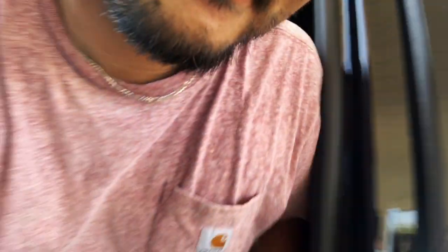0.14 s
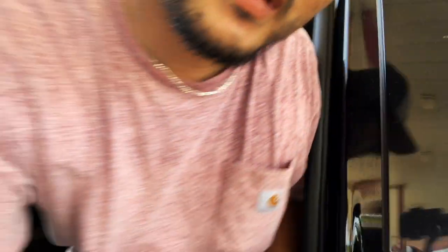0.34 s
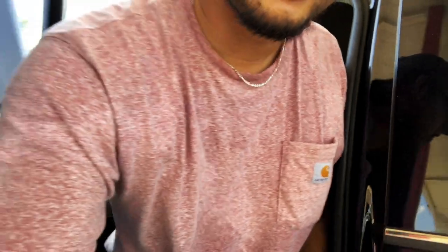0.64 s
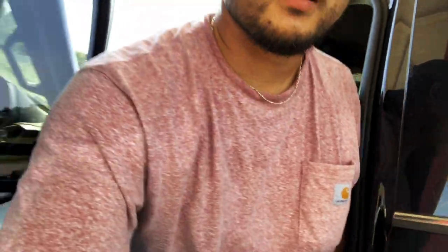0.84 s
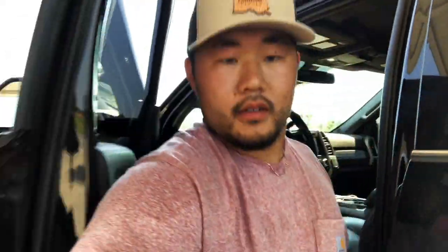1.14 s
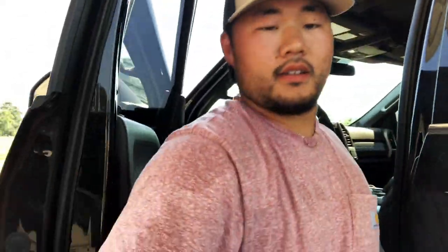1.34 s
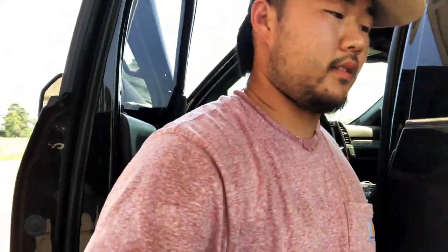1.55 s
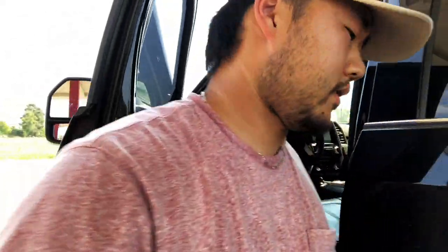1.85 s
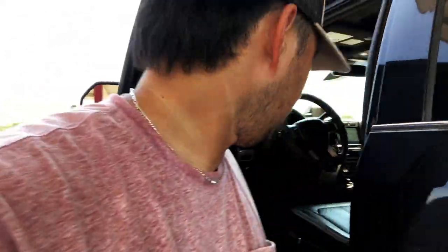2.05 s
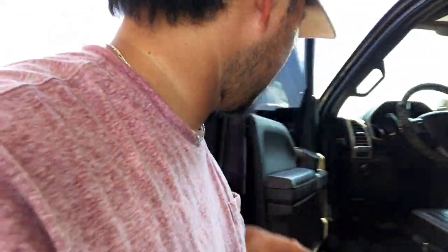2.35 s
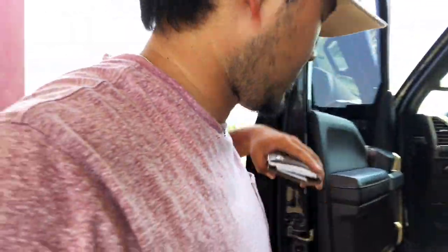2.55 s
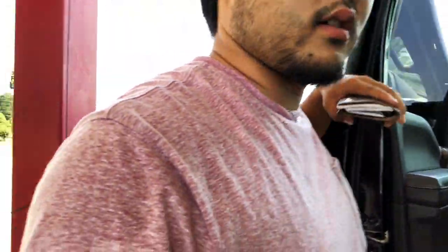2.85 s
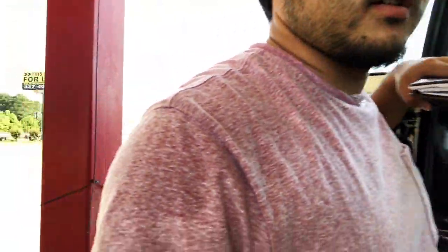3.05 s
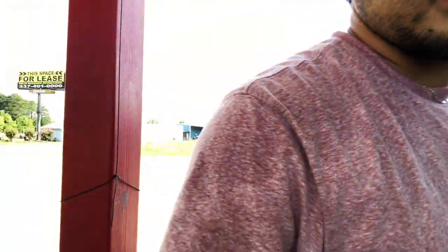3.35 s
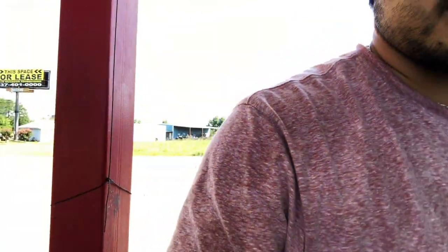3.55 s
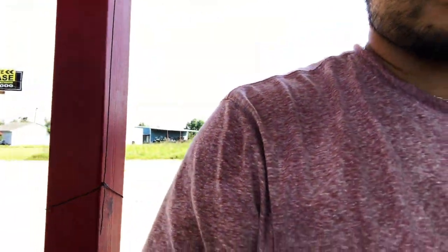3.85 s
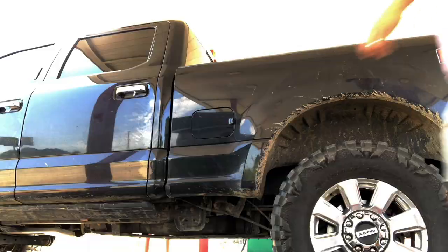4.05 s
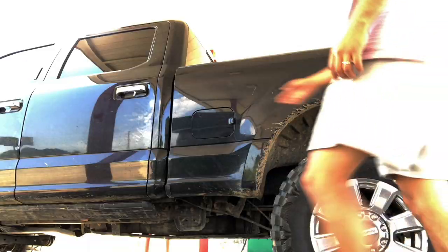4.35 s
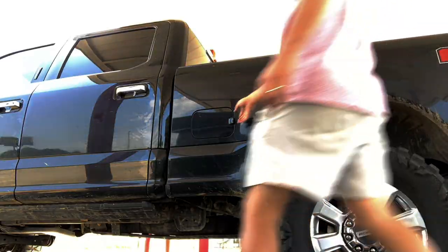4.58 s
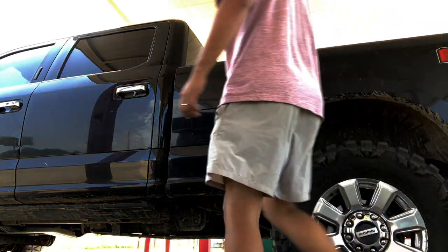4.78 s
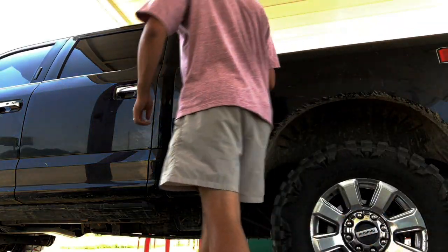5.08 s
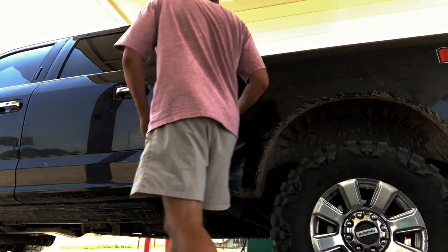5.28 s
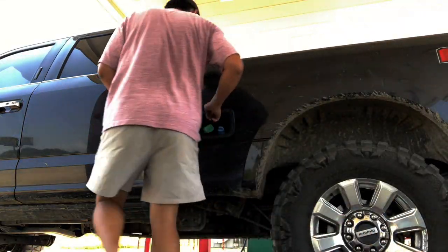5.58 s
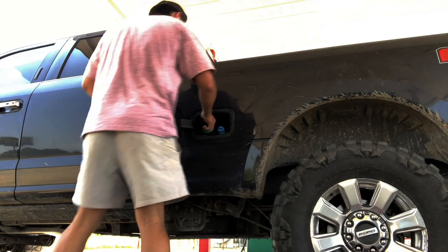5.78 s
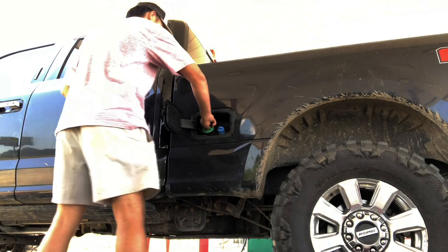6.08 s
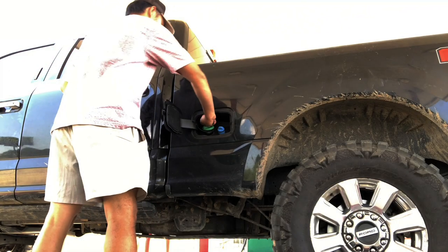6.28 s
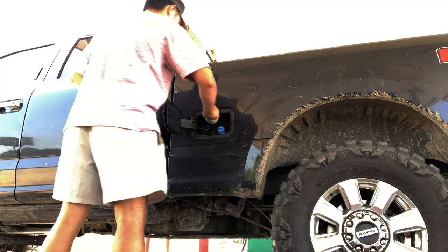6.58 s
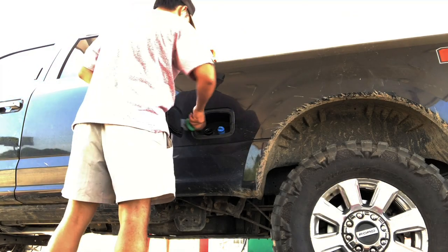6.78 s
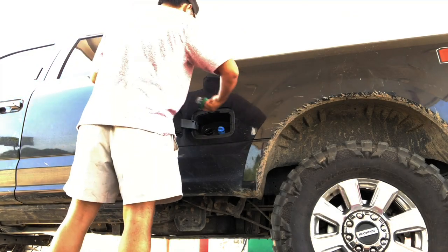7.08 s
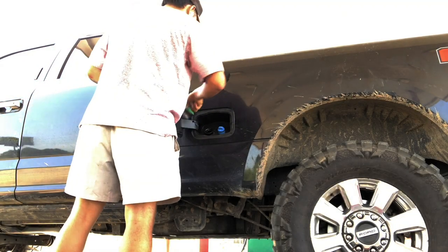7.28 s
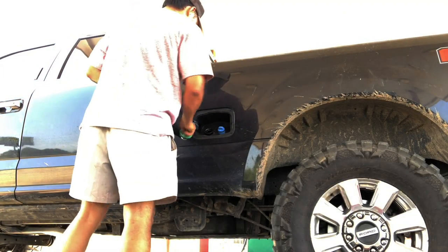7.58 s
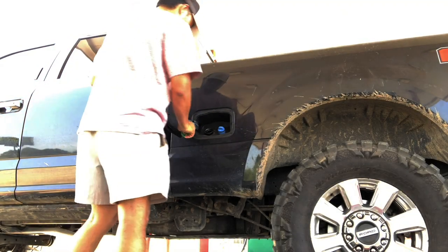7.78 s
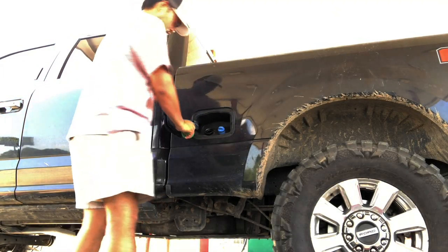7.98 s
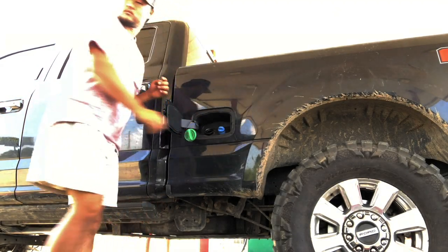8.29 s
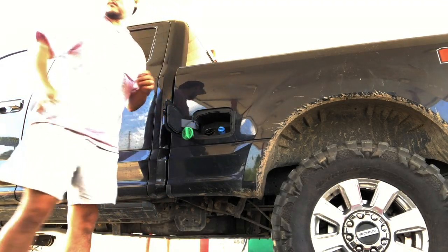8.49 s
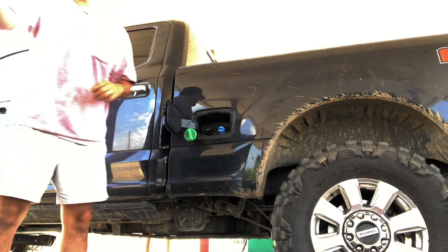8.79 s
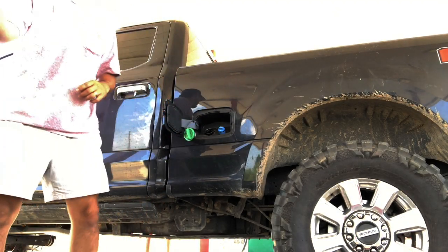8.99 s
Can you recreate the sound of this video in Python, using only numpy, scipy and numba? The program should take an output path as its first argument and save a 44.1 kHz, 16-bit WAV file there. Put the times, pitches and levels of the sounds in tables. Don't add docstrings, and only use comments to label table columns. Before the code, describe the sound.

Close phone microphone under a forecourt roof: a steady, lumpy diesel idle with breathy exhaust, rattling valve gear and a rhythmic squeak. First comes a bright buckle clink, a small tap, faint cloth rustle and soft panel hums, then a heavy door slam. At once the position jumps near the rear wheel, the exhaust tone firmer and boomier. A hard plastic flap clack and lighter cap rattle follow, with stray ticks, a wind puff and a soft final scuff.

```python
import sys
import numpy as np
from scipy import signal
from scipy.fft import rfft, irfft, next_fast_len
from scipy.io import wavfile
from scipy.ndimage import uniform_filter1d
from numba import njit

SR = 44100
rng = np.random.default_rng(int(sys.argv[2]) if len(sys.argv) > 2 else 0)


def materialize(psi):
    bounded = np.clip(np.atleast_2d(psi).T, -1, 1)
    quanta = np.round(bounded * 32767).astype(np.int16)
    wavfile.write(sys.argv[1], SR, quanta)


def ratio_of_db(decibels):
    return 10 ** (np.asarray(decibels, float) / 20)


N = 402633
TIME = np.arange(N) / SR
MOVE_S = 3.945

# time_s, firing_hz
CAB_SPEED = [(0.33, 40.02), (1.02, 40.1), (1.73, 39.65), (2.42, 39.85), (2.78, 39.79), (3.55, 40.01)]
WHEEL_SPEED = [(4.35, 39.84), (4.75, 40.0), (5.55, 39.99), (5.95, 39.86), (6.35, 40.26), (6.75, 40.38),
               (7.55, 39.98), (8.75, 39.94)]
# order (multiple of the engine cycle rate), level_db
CAB_ORDERS = [(8, -29.5), (11, -44.3), (12, -47.3), (13, -33.8), (14, -41.8), (15, -48.2), (16, -42.7),
              (17, -48.2), (18, -49.2), (19, -43.8), (23, -47.7), (24, -35.7), (25, -46.5), (26, -50.4),
              (27, -46.3), (28, -54.3), (29, -50.8), (30, -46.5), (31, -48.8), (33, -56.6), (35, -55.5),
              (38, -58), (40, -59.5), (41, -61), (46, -60), (56, -61.1), (57, -59.4), (59, -58.9),
              (60, -62.5), (64, -56.9)]
WHEEL_ORDERS = [(8, -23.5), (9, -56), (10, -55), (11, -46.5), (12, -52), (13, -38.3), (14, -49), (15, -54),
                (16, -44.3), (17, -50), (18, -46.5), (19, -41), (22, -52.5), (23, -47), (24, -33.3),
                (25, -42), (26, -52), (27, -43.3), (28, -49), (29, -47), (30, -37.8), (31, -48.5),
                (32, -53), (33, -45), (34, -51.5), (35, -47.5), (36, -53), (37, -49), (38, -42.5),
                (39, -57), (40, -44), (41, -48.5), (43, -50), (44, -59), (50, -56), (54, -61), (55, -60),
                (56, -53), (57, -51.5), (59, -60), (60, -54), (62, -58.5), (63, -59), (64, -58.5)]
CYLINDER_DB = [7, 0, 0, 7, 0, 0, 5, 0]
CAB_ARRIVAL = .4705, [(8, 5), (12, 148.8), (23, 1.3), (27, 113), (31, 9), (45, 25), (59, 5), (65, 166.1)]
WHEEL_ARRIVAL = 4.371, [(8, 15.9), (20, 1), (26, 109.3), (32, 21.2), (36, 49.3), (41, 64), (56, 2.8),
                 (65, 90.1)]
# time_s, level_db
CAB_NEAR = [(0, -3.5), (.5, -3), (1, -4), (1.5, -1.5), (2, 0.2), (2.6, 0.5), (3.3, 2), (3.95, 0.5)]
WHEEL_NEAR = [(3.95, 0.91), (5, 0.58), (6, 0.38), (6.6, -1.5), (7.5, -1.1), (9.13, -0.46)]
CAB_FOLLOWS, WHEEL_FOLLOWS = (0.83, 0.45, 0.34, 0.72), (0.77, 0.66, 0.67, 0.23)
# pitch_hz, level_db (per Hz)
CAB_ROAR = [(22, -10.3), (32, -2.7), (45, 0.0), (65, -2.8), (95, -4.8), (140, -5.4), (200, -11.0),
            (250, -11.1), (310, -10.6), (420, -14.0), (600, -16.0), (900, -19.6), (1400, -20.5),
            (1900, -25.4), (3000, -30), (5000, -40)]
WHEEL_ROAR = [(22, -12.8), (32, -7.4), (45, -4.4), (65, -4.0), (95, -1.1), (140, 0.0), (200, -4.2),
              (310, -8.8), (420, -9.4), (600, -12.7), (900, -17.9), (1400, -21.1), (1900, -25.2),
              (3000, -29.1), (5000, -40)]
# pitch_hz, width_hz, level_db
CAB_HOLLOWS = [(188, 57, 1), (310, 14, -8), (410, 25, -1), (788, 86, 6), (1080, 54, 5.5), (1430, 76, -22)]
WHEEL_HOLLOWS = [(295, 36, 3.5), (438, 27, 5), (600, 33, 5.7), (780, 24, 2.8), (967, 140, 3),
                 (1150, 270, 0.5)]
# pitch_hz, level_db (per Hz)
HISS = [(1180, -9), (2000, -6), (2260, -2), (2550, -9.5), (3390, -6), (3630, -1.5), (5090, -8.5),
        (6050, -9.5), (7130, -11.5), (7840, -12.5), (13200, -15.5), (15800, -25.5)]
# pitch_hz, width_hz, level_db
BLOCK = [(3214, 100, -6), (3620, 65, -2), (4720, 67, -6), (5480, 67, -8.5), (5870, 160, -9),
         (7760, 110, -10)]
# centre_s, length_s, roar_db, hiss_db
SWELLS = [(.12, 0.16, 1, -0.5), (.38, 0.13, 0, 1.5), (1.3, 0.58, 2, -0.8), (2.49, 0.21, 0, 2.3),
          (3.4, 0.35, 0, 1.5), (4.2, 0.32, -0.3, 1.8), (5.8, 0.66, -0.5, 0.9), (6.29, 0.1, 3.5, 0),
          (6.45, 0.065, 2, 0.5), (6.68, 0.085, 1, -0.5), (7.44, 0.099, 1.6, 0.7), (8.63, 0.21, 2, -0.5)]
# pitch_hz, width_hz, level_db
SQUEAK = [(4830, 500, -63), (13600, 700, -71)]
# start_s, peak_db, pitch_hz
CHIRPS = [(0.3765, -47, 4580), (0.598, -49, 4650), (1.3488, -49, 4790), (1.6023, -54, 4820),
          (1.927, -53, 4730), (2.2054, -45.5, 4900), (2.5272, -50, 4720), (2.7494, -50, 4840),
          (2.9562, -50, 4860), (3.0081, -48, 4830), (3.2106, -48, 4800), (4.0926, -56, 4970),
          (4.1395, -54, 4960), (4.4458, -59, 4810), (4.6374, -51, 4890), (5.3128, -47, 4770),
          (5.443, -52, 4780), (7.671, -57, 4690)]
# start_s, level_db, pitch_hz, t60_s (time to fade 60 dB)
SLAM = [(3.5588, -16, 215, .03), (3.5590, -25, 362, .08), (3.5644, -3, 160, .03), (3.5665, -10.5, 256, .03),
        (3.5679, -15, 39, .3), (3.5812, -17.5, 143, .09), (3.5882, -20.5, 59, .16), (3.5896, -25.5, 29, .3),
        (3.5931, -26, 191, .16), (3.6064, -27.5, 71, .3), (3.6204, -23, 37, .3)]
# pitch_hz, level_db, t60_s
BUCKLE = [(820, -12, .06), (1100, -9, 0.036), (1280, -0.5, 0.025), (1620, -5.5, 0.022), (1850, -8, .016),
          (2010, -4, 0.021), (2330, -1, 0.018), (2880, -3, 0.013), (3170, -7, 0.011), (4970, -6, .008),
          (5800, -6, .008), (6600, -11, .008)]
LATCH = [(441, 1.5, 0.043), (613, -3, 0.057), (840, -7, 0.06), (1090, -2, 0.038), (1180, -6, 0.044),
         (1310, -6, .04), (1464, -4.5, 0.053), (1730, -5, 0.045), (1870, -9, 0.037), (2126, -10, .03),
         (2455, -10, .025), (3860, -16, .015), (6230, -13, 0.011)]
FLAP = [(580, -15.5, 0.12), (710, -16, .06), (930, -3, 0.038), (1085, -2, 0.03), (1215, 3, 0.025),
        (1340, 1, 0.024), (1600, -9, 0.03), (1810, -26, .02), (2676, -13, .015), (3700, -25, .012),
        (4160, -11.5, 0.011), (4550, -8.5, 0.0088), (5324, -15, .012), (6400, -14, 0.011)]
CAP = [(1100, -11, .02), (1360, -9, 0.024), (1550, -14, .018), (2530, -11, .012), (2687, -1.5, 0.014),
       (3182, -12, .012), (3680, -3, .014), (4250, -4.5, .016), (4900, -7, 0.013), (5740, 1, 0.017),
       (6500, -2.5, 0.013), (7036, -15, .01)]
TRIM = [(1070, -2, 0.027), (1350, 1, 0.012), (1530, 4.5, 0.012), (1740, -10, 0.012), (2250, -12, .008),
        (2750, -13, .008)]
SOLE = [(1230, 9, .03), (2220, 8, .015), (2760, 8, .015), (3320, 7, .015), (7650, -6, .01)]
SHELL = [(1050, -5, .02), (1360, 3, 0.023), (1540, -9, .018)]
# start_s, ring_db, crack_db, contact_s, dulling_db (per octave)
BUCKLE_BLOWS = [
    (1.0714, -21.5, -28, 0.0025, 0.5),
    (1.0745, -37, -41, .009, -1),
    (1.085, -36, -47, 0.005, -1),
    (1.0945, -28.5, -52, .003, 0),
    (1.103, -30, -53, 0.008, 3),
    (1.113, -33.5, -58, 0.016, 2.5),
    (1.14, -42, -64, .03, 1),
]
LATCH_BLOWS = [
    (3.539, -26, -52, .006, .5),
    (3.546, -28, -54, 0.013, 2.5),
    (3.5575, -19.5, -26.5, 0.0058, .1),
    (3.5598, -23.5, -38, 0.0017, .3),
    (3.571, -29.5, -47, 0.03, 0.87),
]
FLAP_BLOWS = [
    (6.153, -26, -41, 0.012, .1),
    (6.1706, -11, -23, 0.0029, .1),
    (6.184, -29, -48, 0.011, 1.7),
    (6.197, -28, -51, .014, 2.),
]
CAP_BLOWS = [
    (6.3752, -22.5, -27.5, 0.0059, -1),
    (6.380, -36, -32, 0.0067, 8),
    (6.398, -38, -46, 0.0089, 1.5),
    (6.421, -42, -55, .008, 5),
    (6.433, -42, -54, .006, 2),
]
TRIM_BLOWS = [
    (1.5654, -23.5, -52, .0007, .1),
]
SOLE_BLOWS = [
    (9.053, -45, -58, .018, .1),
    (9.078, -45, -60, .025, 4.),
]
SHELL_BLOWS = [
    (6.3778, -28, -60, .0015, .1),
    (6.382, -29, -60, .002, .1),
    (6.397, -34, -62, 0.0045, .1),
    (6.4335, -34, -62, .007, .1),
    (6.282, -37, -62, .004, .1),
    (6.303, -38, -62, .006, .1),
]
# start_s, peak_db, length_s
TICKS = [(0.3154, -37, .001), (0.3828, -33, .0006), (0.3986, -15, .00002), (1.723, -34, .001),
         (3.586, -32, .001), (3.96, -32, .001), (4.2273, -34, .001), (5.3144, -33, .001),
         (5.553, -17.5, .00002), (6.8772, -15, .00002), (8.203, -14, 0.000016)]
# centre_s, length_s, peak_db,
# pitch_hz, glide_hz_per_s
HUMS = [(.372, .02, -61, 12950, 9000), (.42, .018, -64, 12900, -6000), (1.25, .06, -51, 500, -300),
        (1.526, 0.045, -45, 318, 602), (1.103, 0.081, -46.5, 438, -60), (1.368, 0.066, -45.5, 555, -100),
        (1.618, 0.046, -44.5, 405, 300), (2.744, 0.13, -49, 310, -0.5), (2.799, 0.054, -56, 1090, 3),
        (3.029, 0.083, -46.5, 550, -2), (3.166, 0.081, -42, 318, -150), (3.397, 0.12, -42.5, 320, -78.5),
        (3.367, 0.063, -51, 1090, -1), (3.719, .12, -46, 320, 55.5), (3.787, .07, -51, 1085, 1),
        (3.934, 0.027, -39.5, 332, -200), (3.938, 0.027, -46, 1085, -4)]
# start_s, level_db, length_s
RUSTLES = [(0.342, -61, 0.14), (1.07, -54, 0.048), (1.673, -58, 0.11), (2.328, -58, 0.18), (2.98, -59, .16),
           (5.695, -56.5, 0.049), (9.03, -57, 0.056)]
# start_s, peak_db, rise_s
GUSTS = [(0, -43, 0.059), (1.28, -41, .05), (1.70, -47, 0.072), (2.0, -50, .1), (7.33, -37, .05),
         (9.07, -51, 0.023)]


@njit
def svf(x, hz, width):
    y, band, low = np.empty(len(x)), 0., 0.
    g, k = np.tan(np.pi * hz / SR), width / hz
    for i in range(len(x)):
        v = (band + g * (x[i] - low)) / (1 + g * (g + k))
        band, low, y[i] = 2 * v - band, low + 2 * g * v, k * v
    return y


def unit(x):
    return x / np.sqrt(np.mean(x ** 2))


def fade(t, t60):
    return np.exp(-np.log(1000) * t / t60)


def curve(rows):
    s, value = np.transpose(rows)
    return np.interp(TIME, s, value)


def walk(rate):
    hold = int(SR / rate)
    steps = np.repeat(rng.standard_normal(N // hold + 1), hold)
    return 1.3 * uniform_filter1d(uniform_filter1d(steps, hold), hold)[:N]


def coloured(points, flicker_db):
    hz, db = np.transpose(points)
    size = next_fast_len(N)
    f = np.arange(1, size // 2 + 2) * SR / size
    shape = ratio_of_db(np.interp(np.log(f), np.log(hz), db, -99, -99))
    spectrum = rfft(rng.standard_normal(size)) * shape
    octave = np.log2(f / 20).astype(int)
    out = np.zeros(N)
    for k in range(10):
        out += irfft(spectrum * (octave == k), size)[:N] * ratio_of_db(flicker_db * walk(9))
    return unit(out)


def add(out, s, burst):
    i = int(s * SR)
    out[i:i + len(burst)] += burst[:N - i]


def exhaust(speed, orders, arrival, near, follows, wobble_db):
    firing_s, paths = arrival
    cycle = np.cumsum(curve(speed)) / SR / len(CYLINDER_DB)
    cycle = cycle - cycle[int(firing_s * SR)]
    pattern = np.angle(np.fft.fft(ratio_of_db(np.array(CYLINDER_DB))))
    tops, late_ms = np.transpose(paths)
    late = late_ms / 200
    near_db = np.outer(follows, curve(near))
    out = np.zeros(N)
    for k, db in orders:
        k = round(k)
        path = np.searchsorted(tops, k)
        angle = 2 * np.pi * k * (cycle - late[path]) + pattern[k % len(pattern)]
        jitter = .004 * k * walk(3)
        wander_db = wobble_db * np.sqrt(k / 8) * walk(3.984)
        part = (k > 8) + (k > 20)
        out += np.sqrt(2) * ratio_of_db(db + near_db[part] + wander_db) * np.cos(angle + jitter)
    return out, cycle


def roar(points, hollows):
    gas = coloured(points, 1.05)
    return gas + sum(ratio_of_db(db - 8.0) * svf(gas, 1. * hz, 1. * width) for hz, width, db in hollows)


def swells():
    return sum(np.outer(db, np.exp(-((TIME - s) / length) ** 2)) for s, length, *db in SWELLS)


def gas_roar(cycle, moved, lift_db):
    cab_db = -44 + CAB_FOLLOWS[-1] * curve(CAB_NEAR)
    wheel_db = -45 + WHEEL_FOLLOWS[-1] * curve(WHEEL_NEAR)
    level_db = lift_db + (1 - moved) * cab_db + moved * wheel_db
    firing = 1.5 + 0.13 * np.cos(2 * np.pi * len(CYLINDER_DB) * cycle)
    cab_gas = ratio_of_db(0.76) * roar(CAB_ROAR, CAB_HOLLOWS)[::-1]
    wheel_gas = ratio_of_db(1.66) * roar(WHEEL_ROAR, WHEEL_HOLLOWS)
    return ratio_of_db(level_db) * firing * ((1 - moved) * cab_gas + moved * wheel_gas)


def valve_clatter(cycle, lift_db):
    turn = 0.75 + 0.17 * np.exp(-((2 * cycle - .2) % 1) / 1.24)
    taps = rng.standard_normal(N) * ratio_of_db(3.56 * rng.exponential(size=N))
    block = sum(ratio_of_db(db) * unit(svf(taps, 1. * hz, 0.54 * width)) for hz, width, db in BLOCK)
    return ratio_of_db(lift_db - 60) * turn * (ratio_of_db(4.5) * coloured(HISS, 0.98) + ratio_of_db(-4.0) * block)


def valve_squeak(cycle, moved):
    squeak_at = np.where(moved > .5, 0.45, 0.37)
    place = (cycle - squeak_at + .5) % 1 - .5
    gate = np.exp(-(place / 0.095) ** 2) * ratio_of_db(1.5 * walk(4.6))
    return gate * sum(ratio_of_db(db) * unit(svf(rng.standard_normal(N), 1. * hz, 1. * width)) for hz, width, db in SQUEAK)


def belt():
    out, t = np.zeros(N), np.arange(SR // 10) / SR
    for s, db, hz in CHIRPS:
        squeak = unit(svf(rng.standard_normal(len(t)), 1. * hz, 240.0))
        add(out, s, ratio_of_db(db - 5.5) * squeak * np.exp(-t / 0.029))
    return out


def door():
    out, t = np.zeros(N), np.arange(SR // 2) / SR
    for s, db, hz, t60 in SLAM:
        attack = np.minimum(t / 0.0035, 1)
        add(out, s, ratio_of_db(db) * np.sin(2 * np.pi * hz * t) * attack * fade(t, t60))
    return out


def knocks(modes, blows, crack_hz):
    out, t = np.zeros(N), np.arange(SR // 5) / SR
    hz, mode_db, t60 = np.transpose(modes)[:, :, None]
    build = np.minimum(t * hz / 2.3, 1)
    rings = np.sin(2 * np.pi * hz * t) * build * fade(t, t60)
    for s, db, crack_db, length, dull_db in blows:
        noise = rng.standard_normal((3, len(t)))
        contact = np.exp(-(t / length) ** 3)
        ring = signal.fftconvolve(rings, (noise[0] * contact)[None], axes=1)[:, :len(t)]
        ring = ring / np.abs(ring).max(axis=1, keepdims=True)
        ring = np.sum(ratio_of_db(mode_db - dull_db * np.log2(hz / 1300)) * ring, axis=0)
        crack = svf(svf(noise[1], crack_hz, 10500.0), 1.17 * crack_hz, 25000.)
        crack = 0.53 * unit(crack) * contact
        tail = unit(svf(svf(noise[2], 950.0, 2500.0), 1100.0, 4900.0))
        tail = tail * np.minimum(t / 0.0057, 1) * np.exp(-t / 0.027)
        tail_db = max(db - 9.5, crack_db) - 13.0
        add(out, s, ratio_of_db(db - 5.5) * ring + ratio_of_db(crack_db) * crack + ratio_of_db(tail_db) * tail)
    return out


def things_handled():
    return (knocks(BUCKLE, BUCKLE_BLOWS, 10500.) + knocks(LATCH, LATCH_BLOWS, 6200.)
            + knocks(FLAP, FLAP_BLOWS, 5800.) + knocks(CAP, CAP_BLOWS, 6000.)
            + knocks(TRIM, TRIM_BLOWS, 3000.) + knocks(SOLE, SOLE_BLOWS, 5000.)
            + knocks(SHELL, SHELL_BLOWS, 4000.))


def ticks():
    out, t = np.zeros(N), np.arange(SR // 5) / SR
    for s, db, length in TICKS:
        noise = rng.standard_normal(len(t))
        click = ((t == 0) + (t > 0) * noise) * np.exp(-t / length)
        add(out, s, ratio_of_db(db - 5.5) * svf(svf(click, 4500.0, 14000.0), 4500., 16000.))
    return out


def hums():
    out, t = np.zeros(N), np.arange(-SR // 3, SR // 3) / SR
    for s, length, db, hz, glide in HUMS:
        noise = rng.standard_normal(len(t))
        waver = unit(uniform_filter1d(uniform_filter1d(noise, SR // 30), SR // 30))
        angle = 2 * np.pi * np.cumsum(hz + glide * t + 6.95 * waver) / SR
        swell = ratio_of_db(db + 3.6 * waver[::-1]) * np.exp(-(t / length) ** 2)
        add(out, s + t[0], swell * np.sin(angle))
    return out * (TIME < MOVE_S + .01)


def rustles():
    out, t = np.zeros(N), np.arange(SR // 4) / SR
    for s, db, length in RUSTLES:
        noise = rng.standard_normal((2, len(t)))
        grains = noise[0] * ratio_of_db(4. * np.abs(noise[1]))
        swell = np.sin(np.pi * np.minimum(t / length, 1)) ** 2
        add(out, s, ratio_of_db(db) * unit(svf(grains, 7500.0, 9000.)) * swell)
    return out


def gusts():
    out, t = np.zeros(N), np.arange(SR // 2) / SR
    for s, db, rise in GUSTS:
        add(out, s, ratio_of_db(db) * np.sin(2 * np.pi * 27 * t) * t / rise * np.exp(1 - t / rise))
    return out


def scene():
    cab, cab_cycle = exhaust(CAB_SPEED, CAB_ORDERS, CAB_ARRIVAL, CAB_NEAR, CAB_FOLLOWS, wobble_db=0.95)
    wheel, wheel_cycle = exhaust(WHEEL_SPEED, WHEEL_ORDERS, WHEEL_ARRIVAL, WHEEL_NEAR, WHEEL_FOLLOWS,
                                 wobble_db=0.34)
    moved = np.clip((TIME - MOVE_S) / 0.011, 0, 1)
    cycle = np.where(moved > .5, wheel_cycle, cab_cycle)
    roar_lift_db, hiss_lift_db = swells()
    engine = (1 - moved) * cab + moved * wheel
    engine = engine + gas_roar(cycle, moved, roar_lift_db) + valve_clatter(cycle, hiss_lift_db)
    engine = engine + valve_squeak(cycle, moved) + belt()
    handling = door() + things_handled() + ticks() + hums()
    return (engine + handling + rustles() + gusts())[None]


def band_limit(x):
    return signal.sosfilt(signal.butter(12, 16510, fs=SR, output="sos"), x)


def record(dry):
    top_cut = signal.ellip(8, .2, 36, 15750, fs=SR, output="sos")
    mix = signal.sosfilt(top_cut, dry)
    return band_limit(mix)


dry = scene()
out = record(dry)
materialize(out)
```